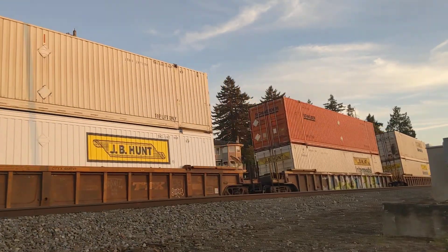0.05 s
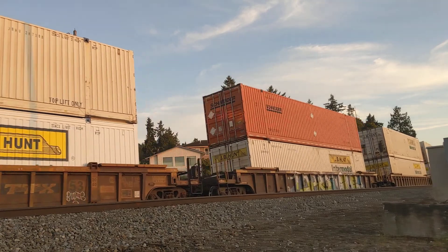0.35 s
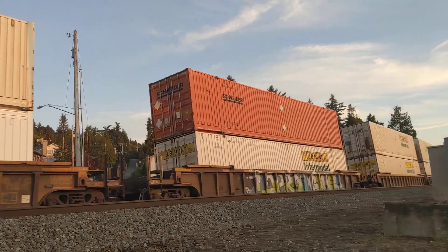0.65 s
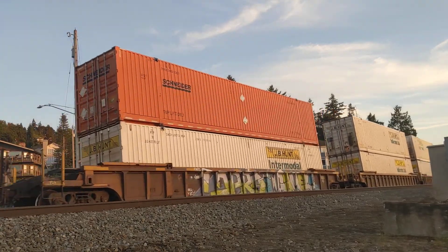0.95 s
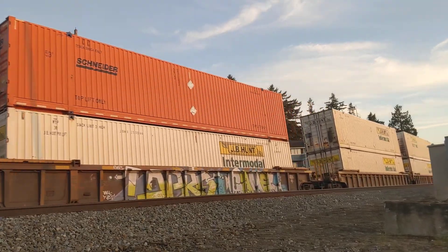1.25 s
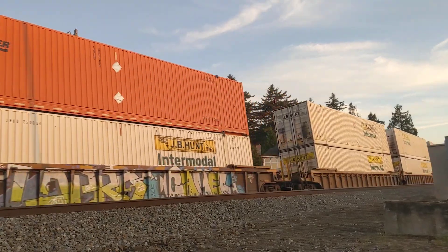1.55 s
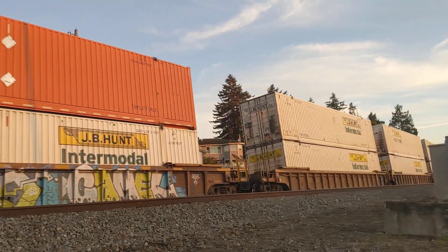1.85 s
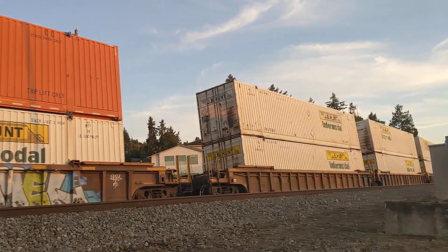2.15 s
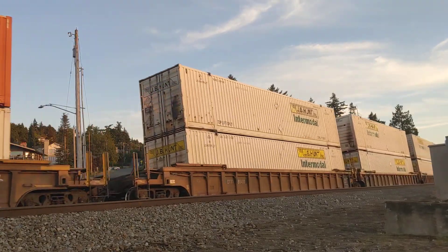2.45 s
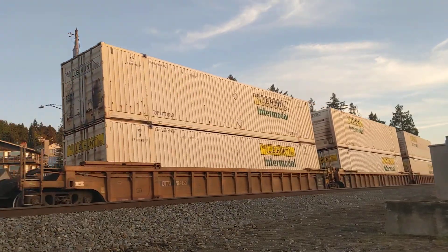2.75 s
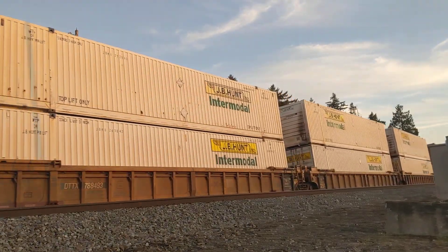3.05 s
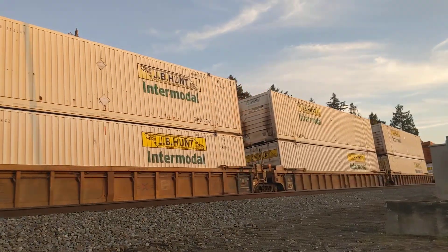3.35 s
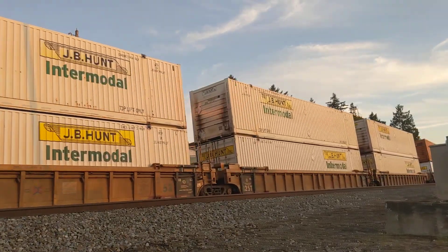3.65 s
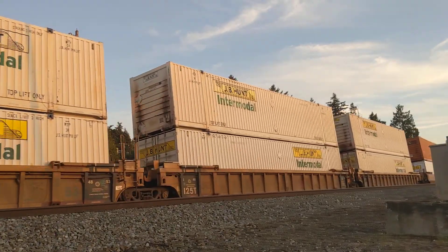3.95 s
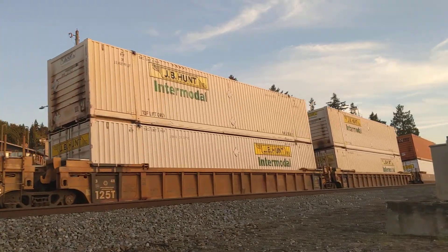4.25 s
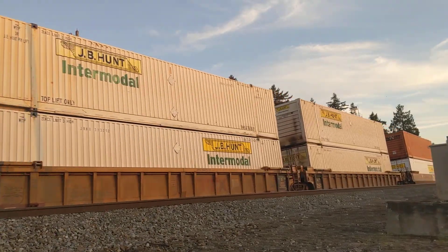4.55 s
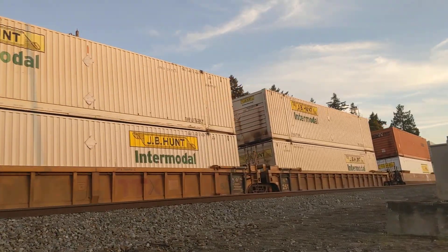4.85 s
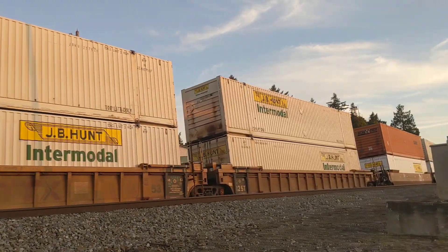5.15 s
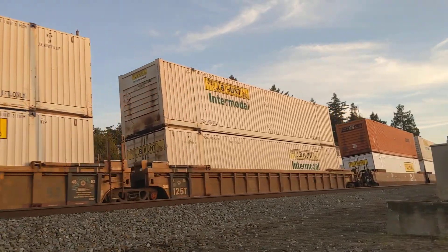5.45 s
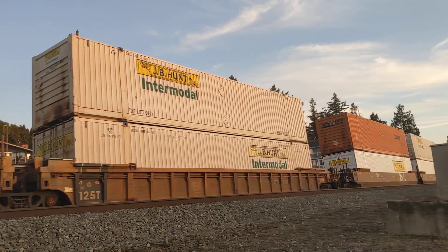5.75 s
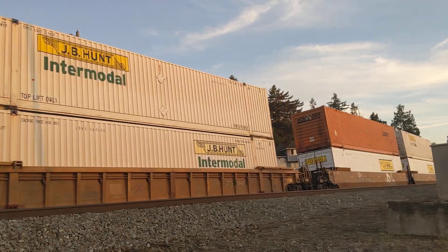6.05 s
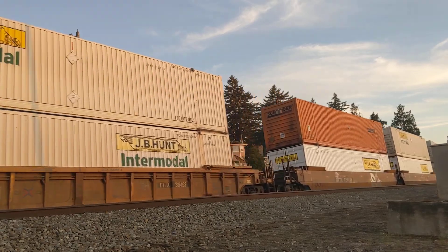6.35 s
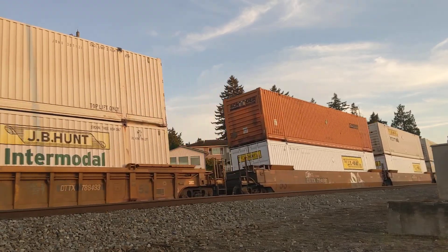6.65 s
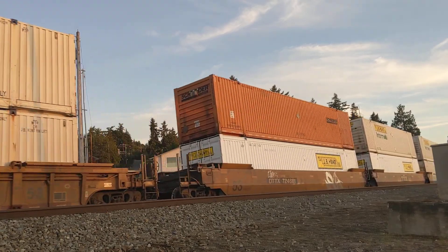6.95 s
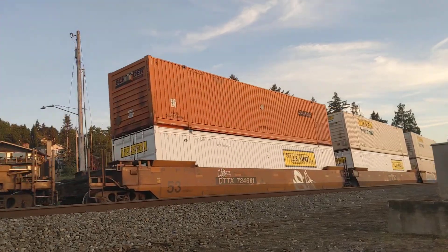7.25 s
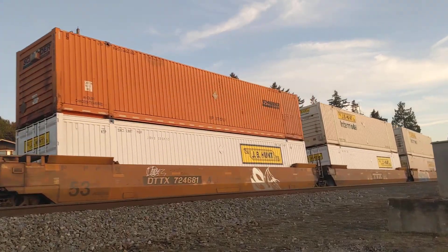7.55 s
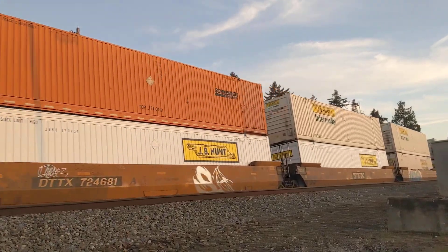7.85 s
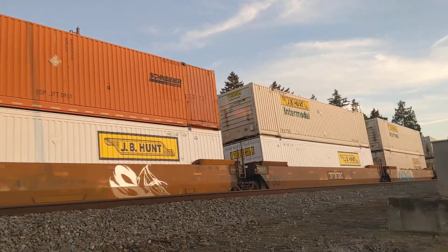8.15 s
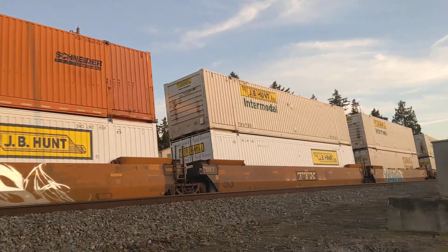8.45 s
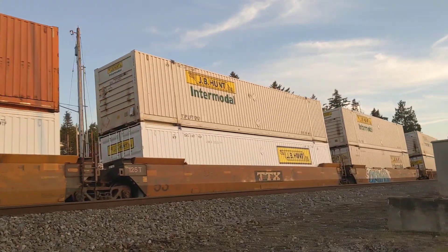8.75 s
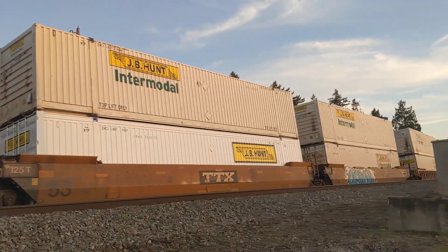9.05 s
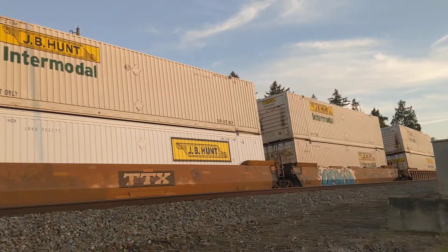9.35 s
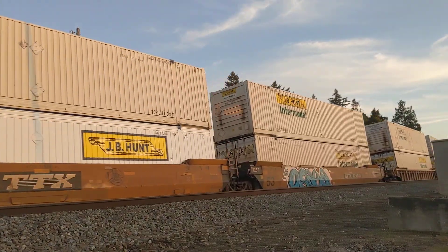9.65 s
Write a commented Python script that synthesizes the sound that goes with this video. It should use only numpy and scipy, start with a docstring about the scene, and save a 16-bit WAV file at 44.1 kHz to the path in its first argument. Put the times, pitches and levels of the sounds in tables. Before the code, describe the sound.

A freight train rolls past close by with a steady low rumble, piercing wheel squeals and hissing, grinding steel.

```python
"""Piercing wheel squeals over the rumble of a double-stack freight train, passing steadily about 10 m away.
Stick-slip locks single wheel modes into tones, each sinking in pitch as its bogie goes by.
Flanges grind and hiss on the rail, rough steel shakes wagons and track, container walls boom,
and a wheel with a flat spot thumps away down the line. Heard at a spaced pair of microphones."""
import sys
import numpy as np
from scipy import signal
from scipy.fft import rfft, irfft, next_fast_len
from scipy.io import wavfile
from scipy.ndimage import uniform_filter1d

SR = 44100
rng = np.random.default_rng(int(sys.argv[2]) if len(sys.argv) > 2 else 0)


def dump_mix(stems):
    """Bounce the given channels to the path in sys.argv[1] as a 16-bit WAV at rate SR."""
    frames = np.atleast_2d(stems).T  # one column per channel
    limited = np.clip(frames, -1, 1)  # hard clip at full scale
    pcm = np.round(limited * 32767).astype(np.int16)
    wavfile.write(sys.argv[1], SR, pcm)


N = 427329
TIME = np.arange(N) / SR
MACH, PASS_S = .0355, .83  # train speed / sound speed; track distance / train speed
RIGHT_LAG_S, FULL_LAG_S = .0005, .000478  # between microphones: noise; a wheel in line with both

# squealing wheel: t/s when abreast of the microphones
ABREAST_S = dict(a=-.3, b=1.3, c=1.43, d=3.15, e=4.7, f=6.2, g=7.87, h=9.35)


def from_db(db):
    """Decibels to gain."""
    return 10 ** (np.asarray(db) / 20)


def rms_one(x):
    """Scale to unit power."""
    return x / np.sqrt(np.mean(np.abs(x) ** 2) + 1e-20)


def in_time(rows):
    """Each column of a curve at every sample."""
    times_s, *columns = np.transpose(rows)
    return [np.interp(TIME, times_s, column) for column in columns]


def at_hz(points, hz):
    """Read a spectrum on a log-frequency axis."""
    points_hz, values = np.transpose(points)
    return np.interp(np.log(hz), np.log(points_hz), values)


def drift(rate_hz, size=N):
    """Smooth random curve of unit RMS."""
    step, settle = 16, 3000
    pole = np.exp(-2 * np.pi * step * rate_hz / SR)
    white = rng.standard_normal(size // step + settle + 2)
    slow = signal.lfilter([1], [1, -2 * pole, pole * pole], white)[settle:]
    return np.interp(np.arange(size) / step, np.arange(len(slow)), rms_one(slow))


def coloured_noise(spectrum, flicker_db, lag_s=0):
    """Stereo noise in flickering third-octave bands; the right channel lags."""
    # likeness of the two microphones: f/Hz, correlation
    likeness = [(60, 0.98), (160, 0.98), (270, 0.86), (450, 0.76), (750, 0.24), (2000, 0.46), (5000, 0.045),
                (15000, 0.17)]
    edges_hz = 18 * 2 ** (np.arange(31) / 3)
    white, out = rng.standard_normal((2, 2, N)), np.zeros((2, N))
    for k, (low, high) in enumerate(zip(edges_hz, edges_hz[1:])):
        hz = np.sqrt(low * high)
        if spectrum[0][0] <= hz <= spectrum[-1][0] * 2 ** (1 / 6):
            band = signal.butter(2, [low, high], "band", fs=SR, output="sos")
            mid, side = signal.sosfilt(band, white[k % 2])
            alike = np.clip(at_hz(likeness, hz), 0, 1)
            gain = from_db(at_hz(spectrum, hz) + flicker_db * drift(11.4))
            out += gain * (np.sqrt(1 + alike) * mid + np.sqrt(1 - alike) * side * [[1], [-1]])
    out[1] = np.roll(out[1], round(lag_s * SR))
    return rms_one(out)


def evened(x):
    """Level out the random swells of a low noise."""
    return x / np.sqrt(uniform_filter1d(np.mean(x ** 2, axis=0), size=SR // 30) + 1e-9)


def narrow_ring(clock, hz, width_hz):
    """Randomly driven resonance: amplitude and phase wander, independently per channel."""
    phase, size = 2 * np.pi * hz * clock, len(clock)
    cos, sin = np.cos(phase), np.sin(phase)
    channels = [drift(width_hz, size) * cos + drift(width_hz, size) * sin for _ in range(2)]
    return np.array(channels) / np.sqrt(2)


def stretch(start_s, end_s, fade_s):
    """Sample slice and its soft-edged gate."""
    part = slice(max(int(start_s * SR), 0), min(int(end_s * SR), N))
    opening = (TIME[part] - start_s) / fade_s if start_s > 0 else 1
    closing = (end_s - TIME[part]) / fade_s if end_s < TIME[-1] - fade_s else 1
    return part, np.clip(np.minimum(opening, closing), 0, 1)


def held(start_s, end_s, attack_s, release_s):
    """Attack-hold-release envelope."""
    attack = 1 - np.exp(-np.maximum(TIME - start_s, 0) / attack_s)
    return attack * np.exp(-np.maximum(TIME - end_s, 0) / release_s)


def shudder(start_s, rise_s, decay_s):
    """Impact envelope, peak 1."""
    envelope = held(start_s, start_s, rise_s, decay_s)
    return envelope / envelope.max()


def doppler_clock(t, abreast_s):
    """Emission time of the sound heard at t: fast on approach, slow afterwards."""
    return t - MACH * np.hypot(t - abreast_s, PASS_S)


def nearness(t, abreast_s, reach_s):
    """Closest distance of a passing wheel over its distance at t."""
    return reach_s / np.hypot(t - abreast_s, reach_s)


def rolling():
    """Rough steel on steel shakes wagons, wheels and rails."""
    # t/s, wagon rumble/dB, wheel roar/dB, rail ring/dB
    levels = [(0, -23, -34.5, -32.5), (0.7, -24.5, -32.5, -36), (1.25, -24, -35.5, -33.5),
              (1.8, -26, -39, -33.5), (2.7, -26.5, -37.5, -39), (3.3, -29.5, -42.5, -38),
              (3.75, -28, -39.5, -36), (4.2, -31.5, -42.5, -36), (4.8, -27, -41, -37.5),
              (5.4, -32, -43, -39.5), (6.3, -30, -44, -36.5), (6.8, -31, -41.5, -33),
              (7.9, -29.5, -41, -36), (8.3, -28.5, -40, -28), (8.8, -29, -40, -32), (9.25, -24.5, -37, -31),
              (9.69, -25, -38.5, -27)]
    # spectra of the three: f/Hz, density/dB
    rumble_spectrum = [(20, -22), (31, -2), (45, -18), (63, 5), (80, -2), (100, 0), (135, -1.5),
                       (170, -2.5), (210, -3.5), (260, -5), (320, -13), (420, -19)]
    roar_spectrum = [(200, -30), (340, -6), (600, -0.5), (800, -2.5), (1000, -3), (1250, -3.5),
                     (1800, -5.5)]
    rail_spectrum = [(900, 0), (1400, -4), (1700, 2), (2100, -1.5), (2700, -3), (3400, -2.5), (4600, -4.5),
                     (7000, -7), (12000, -23)]
    # many wheels sound at once, so the sum changes slowly
    rumble_db, roar_db, rail_db = uniform_filter1d(np.array(in_time(levels)), size=SR // 5)
    rumble = coloured_noise(rumble_spectrum, flicker_db=2.5)
    roar = coloured_noise(roar_spectrum, flicker_db=1.5, lag_s=0.7 * RIGHT_LAG_S)
    rail = coloured_noise(rail_spectrum, flicker_db=4.0, lag_s=RIGHT_LAG_S)
    return (from_db(rumble_db - 1.5) * rumble + from_db(roar_db + 1.5) * roar
            + from_db(rail_db - 1.7) * rail)


def containers(drum_hz=137, drum_db=-34.5, boom_half_s=0.06):
    """Steel boxes drum in one low panel mode, centred, and now and then swell to a boom."""
    # wall booms: peak t/s, level/dB
    booms = [(.88, -25), (1.13, -26.5), (3.9, -24), (4.22, -28), (4.54, -27), (4.95, -30), (5.5, -27),
             (5.85, -35), (6.26, -24), (7.0, -26.5), (7.2, -26), (8.45, -33), (9.3, -24.5)]
    power = from_db(drum_db) ** 2
    for peak_s, level_db in booms:
        power = power + from_db(level_db) ** 2 * np.exp(-((TIME - peak_s) / boom_half_s) ** 2)
    return np.sqrt(power) * narrow_ring(TIME, drum_hz, width_hz=17)[0]


def flat_spot(body_db=-1.0):
    """One blow per wheel turn thuds through bogie and track and sets the rail clanging."""
    # t/s, thud/dB, clang/dB
    blows = [(0.076, -25, -31), (.267, -25.5, -38), (0.466, -24.5, -30.5), (.663, -31, -38),
             (0.86, -23, -37), (1.059, -24, -33), (1.25, -28, -33), (1.45, -24.5, -30.5),
             (1.639, -21, -30.5), (1.84, -23.5, -29.5), (2.045, -25.5, -30.5), (2.252, -25.5, -32),
             (2.449, -26.5, -32), (2.655, -23.5, -34.5), (2.855, -35, -37), (3.06, -32, -44),
             (3.255, -29, -38), (3.46, -29, -40), (3.67, -29, -33)]
    # knock of the passing wheel: loudest t/s, level/dB, time to half amplitude/s
    knock_pass = (0.37, -31, 2.2)
    # spectra of thud, knock and struck rail: f/Hz, density/dB
    thud_spectrum = [(30, -11), (62, 12), (100, 3.5), (180, 11.5), (250, 12), (380, -9.5), (700, -4.5),
                     (1100, -27)]
    knock_spectrum = [(350, -3.5), (480, 3.5), (750, -2.5), (1000, -1), (1400, -3.5)]
    clang_spectrum = [(1100, -20), (1500, 0.5), (1850, 1), (2200, -2), (2700, -12), (3300, -6)]
    loudest_s, knock_db, reach_s = knock_pass
    thud, knock, clang = np.zeros((3, N))
    for start_s, thud_db, clang_db in blows:
        impact = shudder(start_s, rise_s=0.0064, decay_s=0.05)
        thud += from_db(thud_db + body_db) * impact
        knock += from_db(knock_db) * nearness(start_s, loudest_s, reach_s) ** 2 * impact
        clang += from_db(clang_db) * shudder(start_s, rise_s=0.0075, decay_s=0.087)
    return (thud * evened(coloured_noise(thud_spectrum, flicker_db=4.5, lag_s=RIGHT_LAG_S / 2))
            + knock * coloured_noise(knock_spectrum, flicker_db=0.5, lag_s=RIGHT_LAG_S / 2)
            + clang * coloured_noise(clang_spectrum, flicker_db=2.5, lag_s=RIGHT_LAG_S))


def rubbing_levels(idle_grind_db=-41, idle_hiss_db=-40.5):
    """Flange rubs add in power over a floor: coarse grinding and fine hiss in dB."""
    # t/s, length/s, grinding/dB, hiss/dB
    rubs = [(0, 5.2, -36.5, -41), (0, 0.89, -56, -39), (1.19, 0.31, -35.5, -29), (2.81, 0.33, -47, -33.5),
            (3.49, 1.25, -36.5, -35.5), (4.243, 0.23, -32.5, -31), (4.683, 0.45, -31, -28),
            (5.495, 0.31, -34, -34.5), (5.801, 0.51, -38.5, -41), (6.821, 0.99, -33, -35.5),
            (6.963, 0.17, -64, -34), (7.587, 0.64, -32.5, -38), (7.705, 0.047, -39, -36),
            (8.343, 0.95, -37.5, -40), (9.058, 0.59, -31, -33)]
    grind, hiss = from_db(idle_grind_db) ** 2, from_db(idle_hiss_db) ** 2
    for start_s, length_s, grind_db, hiss_db in rubs:
        envelope = held(start_s, start_s + length_s, attack_s=0.0081, release_s=0.045)
        grind = grind + (from_db(grind_db) * envelope) ** 2
        hiss = hiss + (from_db(hiss_db) * envelope) ** 2
    return 10 * np.log10(grind), 10 * np.log10(hiss)


def slip_pings(low_hz, high_hz, count, length_s, spread_db=3.0):
    """Brief slips each ring one mode of a passing wheel, sinking slightly in pitch."""
    out = np.zeros((2, N))
    for when, pitch, place, strength, lag_share in rng.random((count, 5)):
        start_s = when * (TIME[-1] + length_s) - length_s
        part = slice(max(int(start_s * SR), 0), min(int((start_s + length_s) * SR), N))
        t = TIME[part]
        hz = low_hz + (high_hz - low_hz) * pitch ** 0.82  # modes crowd towards the top
        gain = from_db(spread_db * np.log(strength + 1e-3))
        swell = np.sin(np.pi * np.clip((t - start_s) / length_s, 0, 1))
        lag_s = lag_share * FULL_LAG_S * np.array([[0], [1]])
        clock = doppler_clock(t, abreast_s=start_s + 2 * (place - .5)) - lag_s
        out[:, part] += gain * swell * np.sin(2 * np.pi * hz * clock)
    return rms_one(out)


def ringing_wheels(grind_db, hiss_db, modes_db=-3.5, rough_db=-1.5, flare_db=4.0):
    """Grinding shakes each passing wheel into a rough screech in all its modes."""
    # default wheel modes: f/Hz, level/dB
    wheel_modes = [(1570, -7.5), (2080, -7.5), (3200, -13), (4150, -5.5), (4600, 5), (5700, -24),
                   (6300, -3.5), (9300, -19), (10200, -1), (10900, 2.5), (11350, -5), (11900, -2),
                   (12400, -2), (13000, -11), (15200, -6)]
    # wheels that ring with their own set of tones, by wheel: f/Hz, level/dB
    own_modes = dict( e=[(1560, -15.5), (2830, -25), (3200, -11.5), (4050, -3.5), (4500, -1), (4880, 0.5),
                 (5650, -9), (5900, -8), (6350, -11), (7400, -9), (8170, -8.5), (9100, -1.5), (9450, -7),
                 (10800, 7), (11600, 3), (15000, -9), (15550, -8)], f=[(1620, -8.5), (2080, -6), (3740, -6),
                 (4280, -3), (5120, -10), (5930, -10)], g=[(2080, -14), (3450, -5), (3700, -21),
                 (4400, 0.5), (5000, 0.5), (5750, -8.5), (6050, -4.5), (6700, -6.5), (8650, -3),
                 (8950, -7.5), (11950, 2), (12350, 1.5)], h=[(3400, -4), (4000, -2), (4250, -5.5),
                 (4680, 2.5), (4950, -5), (5750, -8), (6650, -7), (8150, -5), (8950, -4), (9250, -9),
                 (10550, 7), (11550, 2), (12450, 5.5), (13800, -4), (15300, -1)])
    out = np.zeros((2, N))
    for wheel in "acdefgh":
        abreast_s = ABREAST_S[wheel]
        part, gate = stretch(abreast_s - 1.1, abreast_s + 0.97, fade_s=1.0)
        clock = doppler_clock(TIME[part], abreast_s)
        for hz, level_db in own_modes.get(wheel, wheel_modes):
            drive_db = (hiss_db if hz > 11400 else grind_db)[part]  # fine slip drives the top modes
            # the contact point wanders, so each mode flares and fades
            flare = rms_one(from_db(flare_db * np.clip(drift(6, len(clock)), -2, 1.5)))
            tone = narrow_ring(clock, hz, width_hz=18)
            rough = from_db(rough_db) * narrow_ring(clock, hz, width_hz=120)
            gain = from_db(drive_db + level_db + modes_db)
            out[:, part] += np.sqrt(gate) * flare * gain * rms_one(tone + rough)
    return out


def grinding_flanges(chatter_db=-0.54, pan_db=1.5):
    """Flanges rub the rail head: chattering scrape and hiss, with pings and ringing wheel modes."""
    # coarse scrape and fine hiss: f/Hz, density/dB
    scrape_spectrum = [(2000, -4.5), (2700, -6.5), (3300, -3.5), (4000, -8), (4700, 1.5), (5900, 2),
                       (6900, -6), (7500, -7), (8200, -2), (9800, 2.5), (11000, 2), (13000, -33),
                       (16000, -30)]
    hiss_spectrum = [(7000, -59), (9500, -26), (10800, -3), (12000, 15), (13500, 28), (15000, 0),
                     (16000, -26)]
    grind_db, hiss_db = rubbing_levels()
    scrape = from_db(grind_db + 3.5) * coloured_noise(scrape_spectrum, flicker_db=3.5, lag_s=RIGHT_LAG_S)
    hiss = from_db(hiss_db) * coloured_noise(hiss_spectrum, flicker_db=1.5, lag_s=RIGHT_LAG_S)
    pings = from_db(grind_db - 3.0) * slip_pings(3700, 6900, count=900, length_s=.2)
    sparkle = from_db(hiss_db + 2.5) * slip_pings(8000, 15200, count=800, length_s=.3)
    wheels = ringing_wheels(grind_db, hiss_db)
    gain = from_db(chatter_db * drift(30) + pan_db * np.array([[.5], [-.5]]))
    return gain * (scrape + hiss + pings + sparkle + wheels)


def flutter(size):
    """Quick unevenness of flange pressure, slow swells removed."""
    pressure = drift(6.5, size)
    return np.clip(rms_one(pressure - uniform_filter1d(pressure, size=SR // 4)), -2.5, 1.3)


def squeal(t, abreast_s, hz, reflected_db, rasp_db=2.5, pan_db=4, aim_rad=.93):
    """Stick-slip locks one wheel mode: a pure tone, with fluttering copies off ballast and wagons."""
    clock = doppler_clock(t, abreast_s)
    bearing_rad = np.arctan((t - abreast_s) / PASS_S)  # negative on approach
    # microphones aim up the line; as the wheel crosses left, the right one hears it later and weaker
    lag_s = FULL_LAG_S * np.sin(np.minimum(bearing_rad + aim_rad, np.pi / 2)) * [[0], [1]]
    pan = from_db(pan_db * np.sin(bearing_rad) * [[.5], [-.5]])
    direct = np.sqrt(2) * np.sin(2 * np.pi * hz * (clock - lag_s) + .3 * drift(8, len(t)))
    reflected = from_db(reflected_db) * narrow_ring(clock, hz, width_hz=30)
    rasp = from_db(rasp_db * np.clip(drift(70, len(t)), -3, 1.2))  # unsteady slip
    return pan * rms_one(rasp * (direct + reflected))


def lesser_squeals(flutter_db=1.3, beam_power=2.38, echo_db=-7.0):
    """Squeals flutter with flange pressure; a wheel beams sideways, loudest when abreast."""
    # t/s, length/s, wheel, f at rest/Hz, level abreast/dB
    squeals = [(0, .66, "a", 6516, -17.5), (.597, 2.1, "a", 6580, -20), (0, 1, "a", 13350, -37),
               (1.3, .17, "b", 13950, -32), (1.652, .12, "c", 10740, -31), (2.86, 1.7, "d", 10350, -30),
               (3.177, .095, "d", 10300, -24), (3.15, .11, "d", 15200, -33), (4.693, .13, "e", 4080, -33),
               (4.693, .99, "g", 10600, -12.5), (4.799, .13, "e", 8220, -27), (4.98, .2, "e", 9230, -29),
               (4.959, .17, "e", 1577, -40), (5.06, .09, "e", 2240, -38), (5.484, .44, "e", 4010, -32),
               (5.756, .05, "f", 1420, -35), (5.95, .55, "g", 5750, -25), (6.56, .08, "f", 2630, -40),
               (6.77, .08, "f", 2640, -38), (6.811, .12, "g", 4960, -20), (7.35, .5, "g", 4975, -33),
               (7.934, .26, "g", 4990, -24.5), (5.5, 1.6, "g", 14520, -33), (7.6, .33, "g", 14440, -26),
               (7.9, .058, "g", 14500, -17), (8.02, .2, "g", 14500, -23), (8.102, .17, "g", 6760, -30),
               (8.382, .38, "h", 5700, -28), (9.18, .5, "h", 5735, -23.5), (9.067, .52, "g", 4840, -16),
               (9.29, .23, "h", 3410, -37), (9.095, .27, "h", 11170, -27)]
    out = np.zeros((2, N))
    for start_s, length_s, wheel, hz, level_db in squeals:
        end_s = start_s + length_s
        part, gate = stretch(start_s, end_s + .25, fade_s=.005)
        t, abreast_s = TIME[part], ABREAST_S[wheel]
        envelope = gate * held(start_s, end_s, attack_s=0.0033, release_s=0.039)[part]
        beam = nearness(t, abreast_s, PASS_S) ** beam_power
        echoes = from_db(echo_db) * narrow_ring(doppler_clock(t, abreast_s), hz, width_hz=125)
        gain = from_db(level_db + flutter_db * flutter(len(t)))
        tone = squeal(t, abreast_s, hz, reflected_db=0.0)
        out[:, part] += envelope * beam * gain * rms_one(tone + echoes)
    return out


def loud_squeals(main_db=-.5, flutter_db=1.0, echo_db=-13.0, echo_follows=.55, echo_falloff=.9):
    """Two firm falling whistles, each over a slow wash of echoes that thins as the wheel recedes."""
    # strength of each squeal: t/s, level/dB
    low_curve = [(0, -35), (.12, -34), (.2, -21), (.33, -33), (.42, -14.5), (.5, -22.5), (.66, -17),
                 (.73, -22), (.83, -15), (1.05, -18.5), (1.16, -9.5), (1.35, -14), (1.52, -13), (1.66, -17),
                 (1.87, -22), (1.99, -17.5), (2.07, -29.5), (2.28, -23), (2.43, -22), (2.75, -30.5),
                 (2.85, -25), (3.22, -28.5), (3.35, -50), (3.56, -29), (3.76, -33.5), (4.3, -37.5),
                 (4.41, -28), (4.7, -55), (5.3, -43.5), (6.8, -45.5)]
    high_curve = [(5.5, -36), (5.85, -33), (5.95, -26.5), (6.3, -31), (6.38, -21), (6.5, -29.5), (6.7, -30),
                  (6.79, -41), (7.03, -29.5), (7.22, -14), (7.26, -13), (7.32, -11), (7.39, -25),
                  (7.52, -8), (7.64, -20.5), (7.69, -20), (7.74, -5), (7.95, -25), (8.0, -6.5),
                  (8.1, -12.5), (8.25, -31), (8.62, -17), (8.72, -27), (9.1, -25), (9.69, -42)]
    out = np.zeros((2, N))
    for wheel, hz, curve in ("c", 4697, low_curve), ("g", 10691, high_curve):
        part, gate = stretch(curve[0][0], curve[-1][0], fade_s=.04)
        t, abreast_s = TIME[part], ABREAST_S[wheel]
        level_db = in_time(curve)[0][part]
        gain = from_db(level_db + main_db + flutter_db * flutter(len(t)))
        whistle = gain * squeal(t, abreast_s, hz, reflected_db=-7.0)
        wash_db = echo_db + echo_follows * uniform_filter1d(level_db, size=SR // 4)
        wash_gain = from_db(wash_db) * nearness(t, abreast_s, PASS_S) ** echo_falloff
        wash = wash_gain * narrow_ring(doppler_clock(t, abreast_s), hz, width_hz=160)
        out[:, part] += gate * (whistle + wash)
    return out


def scene():
    """The whole train at the two microphones."""
    return rolling() + containers() + flat_spot() + grinding_flanges() + loud_squeals() + lesser_squeals()


def record(dry, ceiling=.95, cutoff_hz=16100):
    """Microphone colour, soft peak limiting, steep low-pass."""
    # microphone balance: f/Hz, left minus right/dB
    balance = [(60, 0), (99, 1), (160, 1.5), (270, -0.5), (450, 1), (740, 0), (1220, -2.5), (2010, -3.5),
               (3330, 4), (5500, 0.5), (9080, 0.5), (15000, -9)]
    size = next_fast_len(N + SR // 10)
    hz = np.maximum(np.arange(size // 2 + 1) * SR / size, 1)
    response = from_db(at_hz(balance, hz) * np.array([[.5], [-.5]]))
    coloured = irfft(rfft(dry, size) * response, size)[:, :N]
    rounded = coloured / (1 + (coloured / ceiling) ** 8) ** (1 / 8)
    return signal.sosfilt(signal.ellip(12, .1, 90, cutoff_hz, fs=SR, output="sos"), rounded)


dry = scene()
out = record(dry)
dump_mix(out)
```